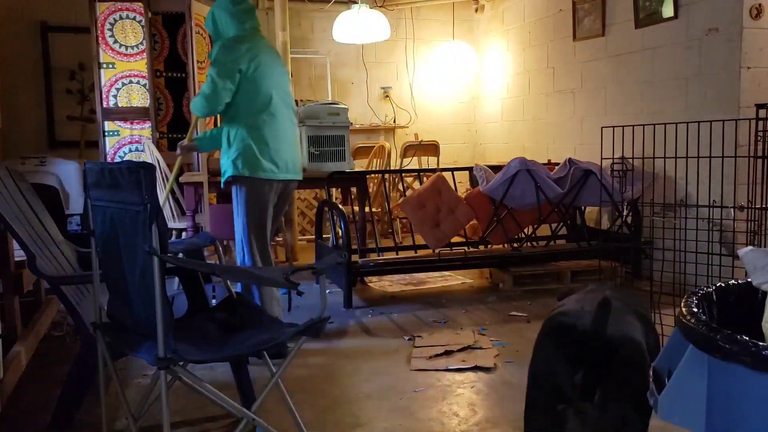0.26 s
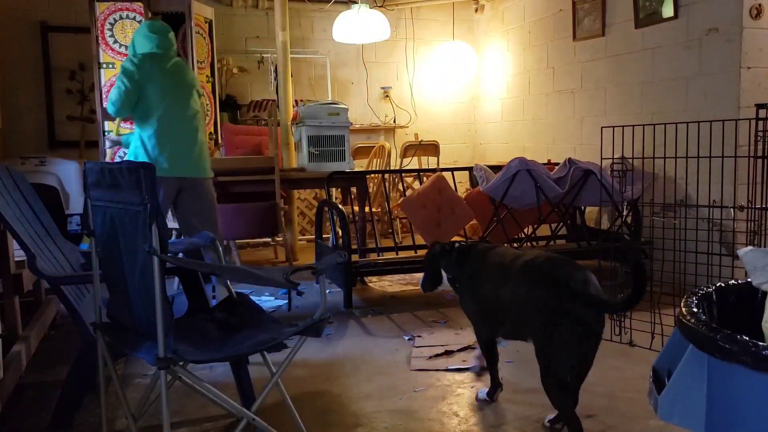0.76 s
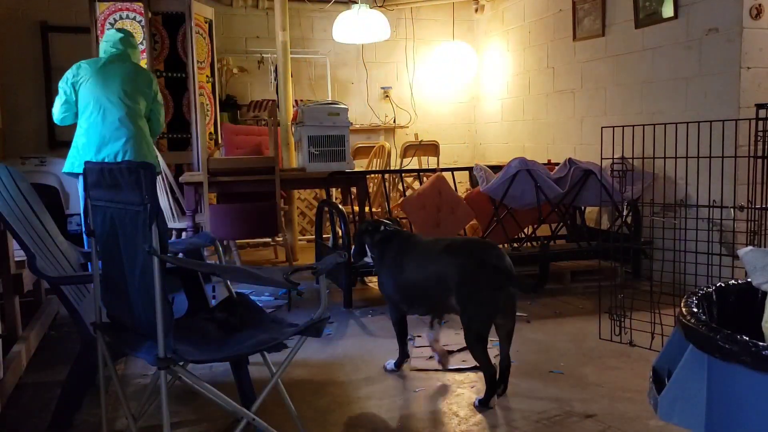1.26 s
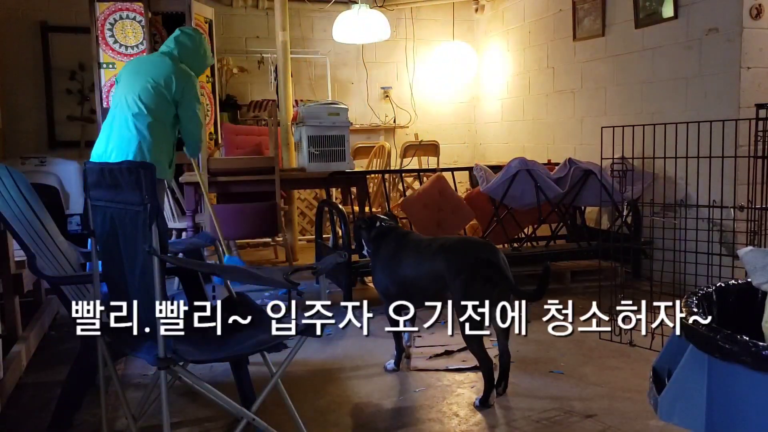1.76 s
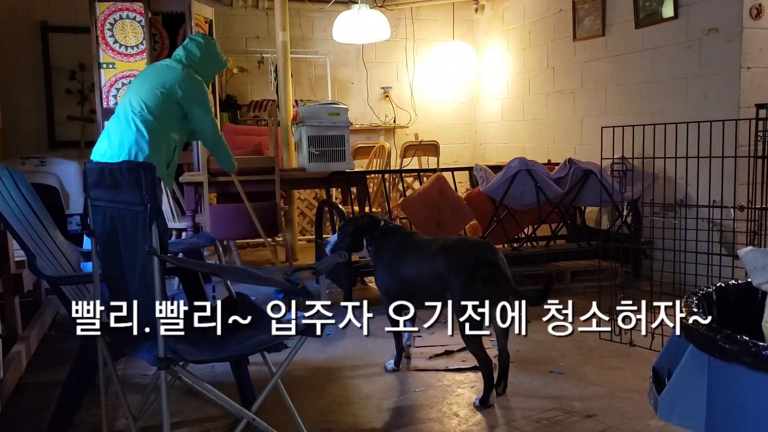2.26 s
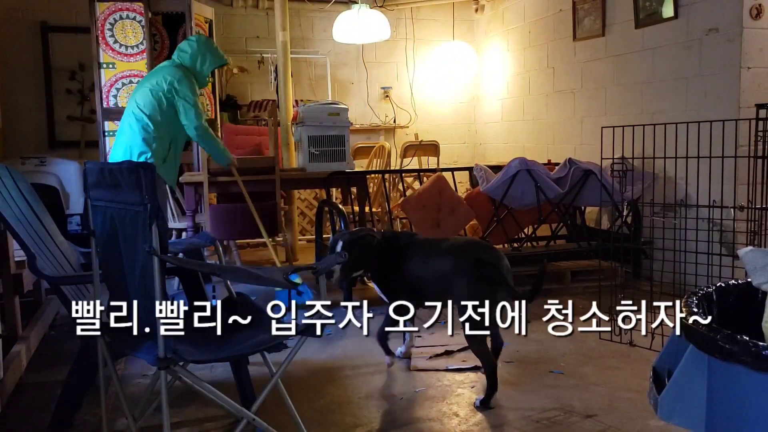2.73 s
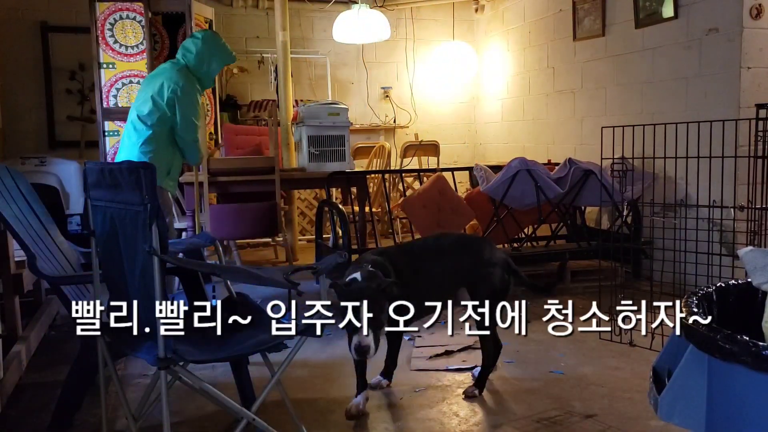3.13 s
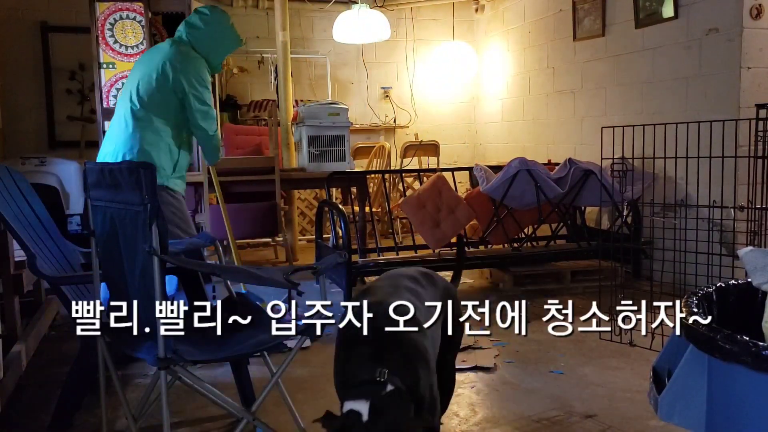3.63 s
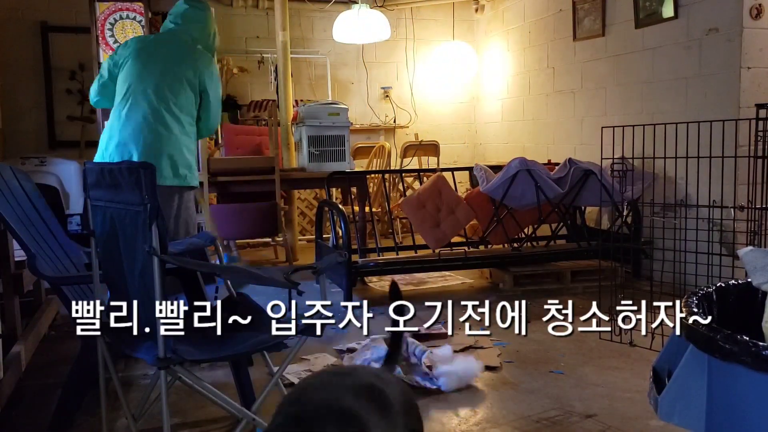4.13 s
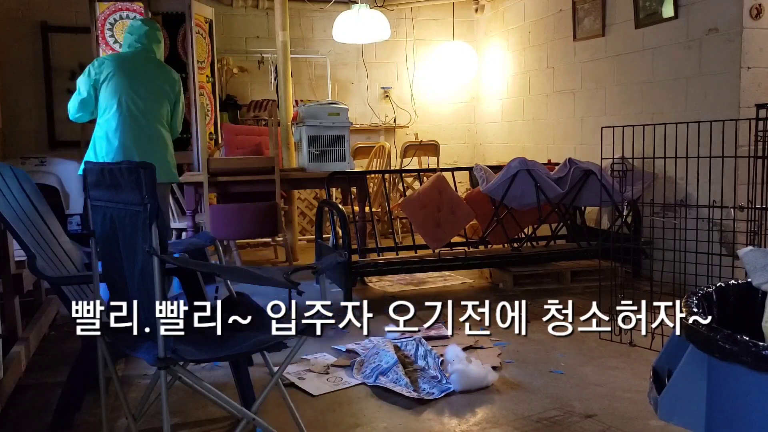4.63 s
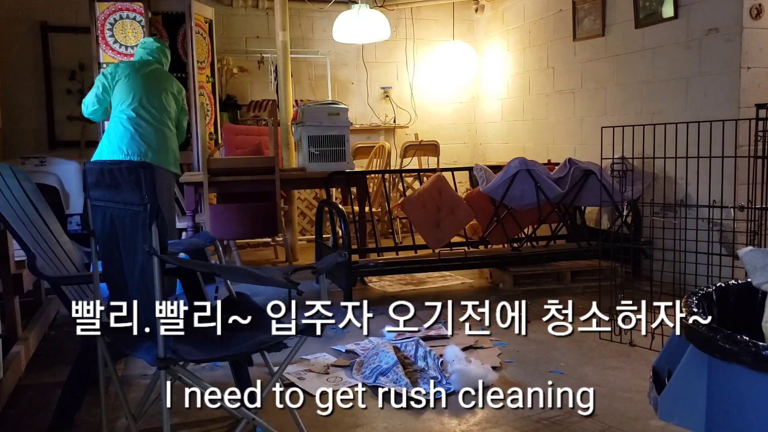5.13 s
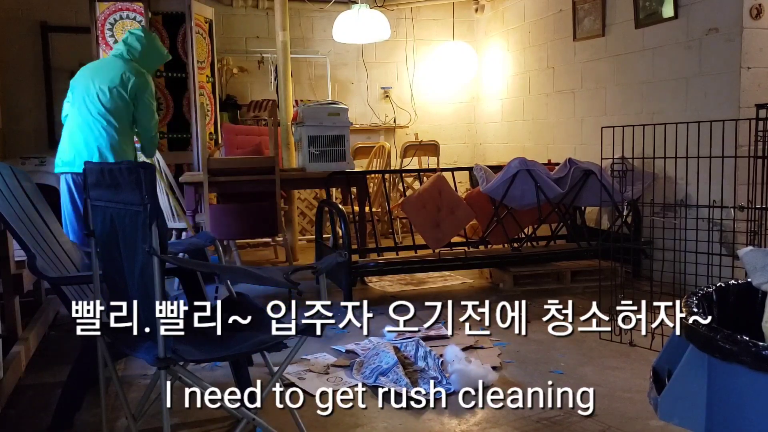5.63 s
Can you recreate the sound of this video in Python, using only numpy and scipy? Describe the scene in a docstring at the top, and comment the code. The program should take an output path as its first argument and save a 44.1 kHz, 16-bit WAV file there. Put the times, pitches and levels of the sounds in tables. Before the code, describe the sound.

A small, hard basement room holds a steady low rumble with a faint fan-like tone and thin hiss. Faint brushing begins at once; at 0.5 to 0.7 s two quick, strong broom strokes scratch the concrete. Hollow wooden knocks with a low boom tumble at 1.07 to 1.2 s, and a brighter, splashy clatter strikes at 1.55 s, between short strokes. A soft thud lands at 1.9 s, then strokes bunch from 2.0 to 2.7 s, with a rasping bristle chatter near 2.4 s. Dry claw ticks appear at 2.73 and 3.3 s. From 3.1 to 4.2 s sweeping resumes, fizzing and rubbing, shoving paper with a dull hollow scuff and a bump at 3.9 s. Afterwards it is sparse: light brushing and crackles, crisp snaps at 4.55, 5.0, 5.25 and 5.86 s, claw ticks at 5.0 s, and deep soft thuds at 5.4 s. Reflections are short; the stereo pickup sits at a modest distance.

```python
"""Quick, uneven broom strokes scratch, fizz and rub on a concrete basement floor, over low room rumble.
Bristles chatter once and shove paper; the head knocks on furniture; a dog's claws tick and feet thud.
After the last stroke: light brushing, crisp snaps, soft thuds, a few claw ticks.
Brushing is filtered random clicks; knocks are dying modes and noise bursts; most pass through a small room."""
import sys
import numpy as np
from scipy import signal
from scipy.fft import rfft, irfft, next_fast_len
from scipy.io import wavfile
from scipy.ndimage import uniform_filter1d

SR = 44100
rng = np.random.default_rng(int(sys.argv[2]) if len(sys.argv) > 2 else 0)


def waveform_to_disk(signal):
    """Save audio, clipped to [-1, 1], as 16-bit WAV at the path in sys.argv[1]."""
    frames = np.transpose(np.atleast_2d(signal))
    scaled = np.clip(frames, -1, 1) * 32767
    samples = np.round(scaled).astype(np.int16)
    wavfile.write(sys.argv[1], SR, samples)


N = 259731
TIME = np.arange(N) / SR
FAST = next_fast_len(N + SR, True)

# broom strokes: (start [s], attack [s], length until the lift [s], relative scratch level [dB],
# fade after the lift [dB/s], tip fizz re scratch [dB], pressed-head rub re scratch [dB])
STROKES = [(0.538, 0.02, 0.058, -40, 99, 1, -0.5), (0.615, 0.019, 0.079, -39, 109, 0.5, 4),
           (1.301, 0.013, 0.043, -49, 158, 1, 7.5), (1.612, 0.013, 0.13, -45, 167, 2.5, 1.5),
           (1.998, 0.013, 0.11, -44, 202, 4, -2), (2.064, 0.026, 0.047, -46, 204, 3.5, 7),
           (2.345, 0.014, 0.087, -46, 150, 5, -24), (2.398, 0.0091, 0.082, -42.5, 120, 6, -20),
           (2.475, 0.018, 0.088, -48, 107, -8, 5.5), (2.62, 0.027, 0.046, -54, 280, -1, -4),
           (3.133, 0.043, 0.1, -50.5, 96, 0.5, 3.5), (3.257, 0.012, 0.11, -46, 84, 3, -1.5),
           (3.351, 0.024, 0.047, -39, 150, 6.5, -0.5), (3.41, 0.016, 0.068, -43.5, 180, -1, 3),
           (3.56, 0.037, 0.08, -49.5, 85, 3.5, 5), (3.745, 0.062, 0.11, -42, 49, 4.5, -3.5),
           (3.919, 0.054, 0.12, -41, 150, 4, -1.5), (4.069, 0.026, 0.13, -49, 126, 1, 1.5)]
# spectrum of the bristle scratch: (frequency [Hz], relative level per Hz [dB])
SCRATCH = [(300, -43), (1200, -21.5), (2200, -2.5), (3000, -1), (4300, 1), (6300, -1), (7700, 1.5),
           (8900, -3), (11000, -2.5), (16000, -29)]
# spectrum of the fizzing tips: (frequency [Hz], relative level per Hz [dB])
FIZZ = [(4000, -6), (8500, 0), (10500, 1.5), (12200, 9.5), (13500, 5.5), (15200, 13), (16500, -26.5)]
# spectrum of splashing or stirring bristles: (frequency [Hz], relative level per Hz [dB])
SPLASH = [(800, -15), (2000, -25), (3000, 3), (6000, 0.5), (9000, -0.5), (12000, 1), (16000, 2.5)]


def gain_of(db):
    """Decibels to amplitude gain."""
    return 10 ** (np.asarray(db) / 20)


def evened(x):
    """Scales to rms 1."""
    return x / np.sqrt(np.mean(x ** 2) + 1e-20)


def read(points, hz):
    """Interpolates a table on a log-frequency axis."""
    f, value = np.transpose(points)
    return np.interp(np.log(hz + 1), np.log(f + 1), value)


def add(mix, start_s, sound):
    """Mixes a sound in at start_s."""
    part = mix[max(round(start_s * SR), 0):][:len(sound)]
    part += sound[:len(part)]


def colour(x, points):
    """Filters by a spectrum in dB."""
    size = next_fast_len(len(x) + SR // 4, True)
    gain = gain_of(read(points, np.fft.rfftfreq(size, 1 / SR)))
    return irfft(rfft(x, size) * gain, size)[:len(x)]


def resonate(x, hz, width_hz):
    """One resonance: shift hz down to zero, low-pass, shift back."""
    turn = np.exp(2j * np.pi * np.cumsum(hz * np.ones(len(x))) / SR)
    r = np.exp(-np.pi * width_hz / SR)
    return 2 * (turn * signal.lfilter([1 - r], [1, -r], x / turn + 1e-18)).real


def wander(rate_hz):
    """Random curve of about rms 1, band-limited below rate_hz."""
    spectrum = rfft(rng.standard_normal(FAST))
    return evened(irfft(spectrum * (np.fft.rfftfreq(FAST, 1 / SR) < rate_hz), FAST)[:N])


def slips(per_s, spread_db, clump_db):
    """Tiny clicks of bristles springing off the grit: uneven in size, and released in tufts."""
    sizes = gain_of(spread_db * np.minimum(rng.exponential(1, N), 5)) * rng.choice([-1, 1], N)
    happens = rng.random(N) < per_s / SR
    return evened(sizes * happens * gain_of(clump_db * wander(110)))


def push(start_s, attack_s, length_s, fade_db_per_s):
    """Gain of one movement: it speeds up, sags gently as it slows, and fades once the pressure is off."""
    sag_db_per_s = 9.5
    t = np.maximum(TIME - start_s, 0)
    fall_db = -sag_db_per_s * t - fade_db_per_s * np.maximum(t - length_s, 0)
    return np.minimum(t / attack_s, 1) * gain_of(fall_db)


def ring(modes, t):
    """Modes after one blow, each dying 60 dB in its t60."""
    return sum(gain_of(db - 60 * t / t60_s) * np.sin(2 * np.pi * hz * t) for hz, db, t60_s in modes)


def burst(points, t, t60_s):
    """A short coloured noise spray of contacts, quick to rise."""
    spray = evened(colour(rng.standard_normal(len(t)), points))
    return spray * gain_of(-60 * t / t60_s) * (1 - np.exp(-t / 0.00021))


def background():
    """Low rumble with a faint fan-like tone and thin hiss; the bass is alike in both ears."""
    # room noise: (frequency [Hz], relative level per Hz [dB])
    rumble_shape = [(15, -13), (30, -7.5), (50, -2.5), (80, -1), (108, 2), (150, -6), (220, -11),
                    (320, -17), (500, -23.5), (720, -20.5), (1100, -28), (2000, -36.5), (4000, -44.5),
                    (16000, -37.5)]
    # left-right likeness: (frequency [Hz], correlation [-1 to 1])
    ear_likeness = [(30, 0.96), (150, 0.98), (300, 0.89), (600, 0.2), (1200, 0.053), (3000, 0.061),
                    (16000, 0.044)]
    level_db, swing_db = -46.5, 0.59
    a, b = rfft(rng.standard_normal((2, FAST)))
    hz = np.fft.rfftfreq(FAST, 1 / SR)
    same = np.clip(read(ear_likeness, hz), -1, 1)
    fan_db = 10 / (1 + ((hz - 836) / 20) ** 2)
    left_right = np.array([a, same * a + np.sqrt(1 - same ** 2) * b])
    pair = irfft(left_right * gain_of(read(rumble_shape, hz) + fan_db), FAST)[:, :N]
    return gain_of(level_db + swing_db * wander(15)) * evened(pair)


def rustling():
    """Light contact: fewer, more separate crackles."""
    # light brushing: (start [s], length [s], relative level [dB], fizz re that level [dB])
    light_moves = [(0.0, 0.0071, -58, 12), (0.053, 0.063, -62, -9), (0.41, 0.024, -67.5, 5),
                   (0.448, 0.057, -59, -1), (0.87, 0.1, -60, 2), (1.105, 0.028, -55.5, 2),
                   (1.399, 0.017, -52.5, 5.5), (1.922, 0.086, -61.5, 1), (2.244, 0.12, -65, 1),
                   (2.72, 0.055, -61, 12), (2.797, 0.07, -57, 3), (2.884, 0.027, -62.5, 6),
                   (4.305, 0.019, -63.5, 7), (4.469, 0.022, -65.5, 17.5), (4.52, 0.017, -60.5, 5),
                   (4.648, 0.025, -59, 5.5), (4.72, 0.035, -58, 2), (5.117, 0.051, -65.5, 8.5),
                   (5.308, 0.099, -70.5, 9), (5.43, 0.03, -58.5, 1), (5.537, 0.061, -61, 6.5),
                   (5.72, 0.017, -72, 9), (5.77, 0.022, -66, 6)]
    attack_s, fade_db_per_s = 0.0043, 197
    power = np.zeros((2, N))
    for start_s, length_s, db, fizz_db in light_moves:
        move = push(start_s, attack_s, length_s, fade_db_per_s)
        power += (gain_of([[db], [db + fizz_db]]) * move) ** 2
    scratch, fizz = np.sqrt(power)
    low, high = (slips(per_s=3500, spread_db=3, clump_db=1.8) for _ in range(2))
    return gain_of(1.5) * scratch * evened(colour(low, SCRATCH)) + fizz * evened(colour(high, FIZZ))


def snaps():
    """Paper, grit and single bristles snap: short crisp bursts, each a hump around its own pitch; the two near
    4.98 s belong with the dog's claw ticks."""
    # snaps: (time [s], relative level [dB], t60 [s], centre [Hz])
    snap_events = [(0.407, -46, 0.044, 8000), (2.009, -36, .06, 13000), (2.361, -27.5, 0.061, 9500),
                   (2.86, -33, 0.035, 13000), (2.95, -35.5, 0.031, 8100), (3.267, -33, 0.12, 3120),
                   (4.547, -34, 0.035, 13000), (4.69, -46, 0.069, 1830), (4.978, -35, 0.044, 11800),
                   (4.993, -34, 0.02, 12200), (5.251, -41.5, 0.038, 9100), (5.675, -43, 0.025, 13500),
                   (5.86, -37.5, 0.018, 13000), (5.872, -43.5, 0.086, 3870)]
    out, t = np.zeros(N), np.arange(SR // 4) / SR
    for s, db, t60_s, hz in snap_events:
        hump = [(hz / 10, -32), (hz / 2, -10), (hz, 0), (hz * 2, -11), (hz * 10, -24)]
        add(out, s, gain_of(db) * burst(hump, t, t60_s))
    return out


def sweeping():
    """Each stroke scratches, fizzes as the tips land, and rubs lower down as the head is pressed."""
    # spectrum of the pressed head's rub: (frequency [Hz], relative level per Hz [dB])
    rub_shape = [(100, -32), (250, -9.5), (500, -7), (800, -3.5), (1250, 0), (1700, -0.5), (2300, -3),
                 (3500, -5), (8000, -22.5)]
    flick_db, flick_s = 2.5, 0.056  # extra fizz as the tips land, dying away
    press_db, press_s = 10.5, 0.073  # the rub starts this far down and grows
    fizz_fade = 0.93  # fizz fade rate after the lift, re scratch
    power = np.zeros((3, N))
    for start_s, attack_s, length_s, db, fade_db_per_s, fizz_db, rub_db in STROKES:
        t = np.maximum(TIME - start_s, 0)
        stroke = push(start_s, attack_s, length_s, fade_db_per_s)
        flick = push(start_s, attack_s, length_s, fade_db_per_s * fizz_fade)
        flick = flick * gain_of(fizz_db + flick_db * np.exp(-t / flick_s))
        press = stroke * gain_of(rub_db - press_db * np.exp(-t / press_s))
        power += (gain_of(db) * np.array([stroke, flick, press])) ** 2
    scratch, fizz, rub = np.sqrt(power)
    tips = slips(per_s=9800, spread_db=5.5, clump_db=-0.4)
    shafts = slips(per_s=7000, spread_db=3.0, clump_db=-1.5)
    head = slips(per_s=7000, spread_db=2, clump_db=1)
    return (gain_of(4.0) * scratch * evened(colour(shafts, SCRATCH))
            + gain_of(0.9) * fizz * evened(colour(tips, FIZZ))
            + gain_of(2.0) * rub * evened(colour(head, rub_shape)))


def stirring():
    """Stray bristles and paper scraps crackle faintly, coming and going, from the first stroke on."""
    relative_db, swing_db = -68, 6
    crackle = colour(slips(per_s=900, spread_db=4, clump_db=2), SPLASH)
    begun = TIME > STROKES[0][0]
    return gain_of(relative_db + swing_db * wander(14)) * evened(crackle) * begun


def knocks():
    """Head blows ring the wood, boom, splash the bristles and clack; harder ones clack higher."""
    # blows: (time [s], relative wood ring [dB], boom [dB], clack [dB],
    # hardness [factor on clack pitch], bristle splash [dB])
    blow_events = [(1.066, -32.5, -39, -30, 1.25, -35), (1.071, -27.5, -21.5, -29, 0.66, -36.5),
                   (1.113, -47, -47, -29.5, 0.67, -48), (1.183, -34.5, -51, -33, 0.48, -42),
                   (1.194, -42, -57, -30.5, 0.7, -44), (1.546, -33.5, -52, -32, 1.7, -32.5),
                   (1.554, -44, -62, -26.5, 1.05, -27), (1.561, -71, -44, -24, 1.63, -25),
                   (1.568, -51, -41, -26, 1.09, -41), (3.905, -36, -43, -54, 0.58, -62)]
    # wooden modes: (frequency [Hz], relative level [dB], t60 [s])
    wood_modes = [(381.3, -29.5, 0.15), (540, -17.5, 0.058), (584, -3.5, 0.12), (672, -2.5, 0.12),
                  (850, -18, 0.7), (965, -13.5, 0.14), (1035, -34, 0.54), (1044, -6, .1),
                  (1185, -40, 0.078), (1614, -10, 0.048)]
    # deep modes: (frequency [Hz], relative level [dB], t60 [s])
    boom_modes = [(150.4, -2, 0.22), (192, -8, 0.24), (227.5, -22.5, 0.41)]
    # clack spectrum at hardness 1: (frequency [Hz], relative level per Hz [dB])
    clack_shape = [(90, -20), (200, 2), (400, 3), (700, 9), (1200, -1), (1700, 0), (2200, -12.5),
                   (5000, -14), (12000, -52)]
    rebound_s, rebound_loss_db = 0.02, 8  # the loose head clacks again, weaker each time
    out, t = np.zeros(N), np.arange(SR // 2) / SR
    for s, wood_db, boom_db, clack_db, hardness, splash_db in blow_events:
        add(out, s, gain_of(wood_db) * ring(wood_modes, t) + gain_of(boom_db) * ring(boom_modes, t))
        add(out, s, gain_of(splash_db) * burst(SPLASH, t, t60_s=0.098))
        for k in range(3):
            clack = burst([(hz * hardness, db) for hz, db in clack_shape], t, t60_s=0.047)
            add(out, s + k * rebound_s, gain_of(clack_db - k * rebound_loss_db) * clack)
    return out


def thuds():
    """Soft footfalls, bumps and taps swell over a few milliseconds and die as one mode."""
    # soft contacts: (time [s], relative level [dB], frequency [Hz], t60 [s])
    thud_events = [(1.559, -32, 219, 0.2), (1.567, -44, 360, 0.07), (1.921, -29, 176, 0.087),
                   (3.868, -38.5, 217, 0.28), (3.905, -48, 416, 0.059), (3.922, -26.5, 293, 0.045),
                   (5.022, -32.5, 890, 0.015), (5.41, -35.5, 91, 0.12), (5.451, -36.5, 100, 0.22)]
    out, t = np.zeros(N), np.arange(SR // 2) / SR
    for s, db, hz, t60_s in thud_events:
        add(out, s, ring([(hz, db, t60_s)], t) * (1 - np.exp(-t / 0.001)))
    return out


def chatter():
    """Bristles pushed against their lean stick and slip: a broad rasping resonance, a weaker one below."""
    # stick-slip spells: (start [s], length [s], relative level [dB])
    grip_spells = [(2.354, 0.058, -43), (2.393, 0.077, -32)]
    rasp_hz, attack_s, fade_db_per_s = 4080, 0.01, 254
    grip = np.max([gain_of(db) * push(s, attack_s, length_s, fade_db_per_s)
                   for s, length_s, db in grip_spells], axis=0)
    upper, lower = (slips(per_s=3000, spread_db=2.2, clump_db=2) for _ in range(2))
    for _ in range(3):  # three passes steepen the skirts
        upper = resonate(upper, rasp_hz, width_hz=1500)
        lower = resonate(lower, rasp_hz * 0.7, width_hz=1500)
    return grip * evened(evened(upper) + gain_of(-11.0) * evened(lower))


def claws():
    """A dog's claws on the concrete: tiny dry ticks, too near for the room to matter."""
    # ticks: (time [s], level [dB])
    claw_events = [(2.7253, -31.5), (2.734, -33), (3.303, -25), (4.978, -36), (4.982, -36), (4.992, -28.5)]
    # tick spectrum: (frequency [Hz], relative level per Hz [dB])
    tick_shape = [(500, -34), (3000, -10), (7000, -3.5), (13000, 5), (16000, 2.5)]
    out, t = np.zeros(N), np.arange(SR // 20) / SR
    for s, db in claw_events:
        add(out, s, gain_of(db) * burst(tick_shape, t, t60_s=0.0075))
    return out


def paper():
    """Sheets shoved ahead of the broom scuff with a dull, hollow tone."""
    # shoves: (start [s], length [s], relative level [dB])
    shove_events = [(3.388, 0.13, -52), (3.55, 0.22, -53), (3.77, 0.11, -52.5), (3.85, 0.077, -45.5)]
    # scuff spectrum: (frequency [Hz], relative level per Hz [dB])
    sheet_shape = [(100, -18), (220, -5.5), (400, -1), (550, -5.5), (720, 1), (1100, -9), (2500, -34),
                   (8000, -45)]
    attack_s, fade_db_per_s = 0.034, 200
    shove = np.max([gain_of(db) * push(s, attack_s, length_s, fade_db_per_s)
                    for s, length_s, db in shove_events], axis=0)
    return shove * evened(colour(slips(per_s=1500, spread_db=2.5, clump_db=2), sheet_shape))


def reflections():
    """The room's answer from one spot: sparse taps for each ear, decaying at a rate set by frequency."""
    # reverberation time: (frequency [Hz], t60 [s])
    decay_times = [(150, 0.27), (600, 0.23), (2000, 0.26), (6000, 0.28), (16000, 0.11)]
    size, taps_per_s, gap_s = SR // 2, 5000, 0.002
    taps = rng.standard_normal((2, size)) * (rng.random((2, size)) < taps_per_s / SR)
    taps = taps * (np.arange(size) > gap_s * SR)
    hz, t, z = signal.stft(taps, SR, nperseg=256)
    early = 1 + 3.3 * np.exp(-t / 0.013)  # floor and nearby furniture answer first
    decay = gain_of(-60 * t / read(decay_times, hz)[:, None])
    spectrum = rfft(signal.istft(z * early * decay, SR, nperseg=256)[1], 2 * size)
    # clutter scatters all pitches evenly
    smooth_power = uniform_filter1d(abs(spectrum) ** 2, size=45)
    tail = irfft(spectrum / np.sqrt(smooth_power + 1e-12))[:, :size]
    return tail / np.linalg.norm(tail, axis=1, keepdims=True)


def basement(x, wet_db, count):
    """Direct sound reaches the left ear first; a moving source crossfades count reflection patterns."""
    # reflected over direct sound, before wet_db: (frequency [Hz], level [dB])
    wet_balance = [(100, -19), (220, -16.5), (500, -8), (1200, -6), (3000, 4.5), (16000, 3)]
    cycles_per_s, right_delay_s = 11, 5e-5
    size = next_fast_len(N + SR, True)
    spot = (TIME * cycles_per_s - np.arange(count)[:, None] / count) % 1 * count
    shares = np.sin(np.pi / 2 * np.minimum(spot, 2))
    room = sum(rfft(x * share, size) * rfft(reflections(), size) for share in shares)
    hz = np.fft.rfftfreq(size, 1 / SR)
    wet = gain_of(read(wet_balance, hz) + wet_db)
    direct = rfft(x, size) * np.exp(-2j * np.pi * hz * np.array([[0], [right_delay_s]]))
    return irfft((direct + wet * room) / np.sqrt(1 + wet ** 2), size)[:, :N]


def scene():
    """Broom, knocks and thuds in the room, plus dry claws and the background."""
    # knocks and thuds carry little deep bass: (frequency [Hz], gain [dB])
    low_cut = [(30, -26), (70, -9), (130, 0), (16000, -0.5)]
    brush = sweeping() + rustling() + stirring() + paper()
    brush = gain_of(2.5) * basement(brush, wet_db=5.5, count=8)
    blows = basement(colour(knocks() + thuds(), low_cut), wet_db=5.5, count=2)
    crisp = basement(chatter() + snaps(), wet_db=-3, count=5)
    return brush + blows + crisp + claws() + background()


def record(dry):
    """Left and right microphones differ in tone, the left brighter at the top; then a low-pass."""
    # tone balance: (frequency [Hz], left minus right [dB])
    left_over_right = [(100, 0.6), (300, 1.5), (3000, 0), (7000, .3), (10500, 0.5), (13000, 5), (16000, 8)]
    edge_hz = 16000
    ports = np.array([colour(x, [(hz, side * db / 2) for hz, db in left_over_right])
                      for x, side in zip(dry, (1, -1))])
    low_pass = signal.firwin(511, edge_hz, window=("kaiser", 9), fs=SR)
    return signal.oaconvolve(ports, low_pass[None], "same")


dry = scene()
out = record(dry)
waveform_to_disk(out)
```